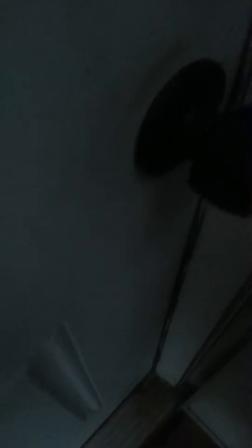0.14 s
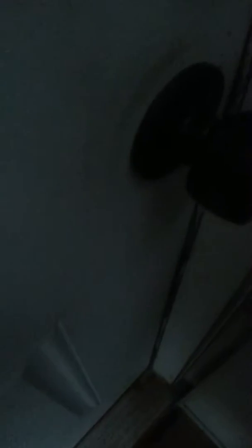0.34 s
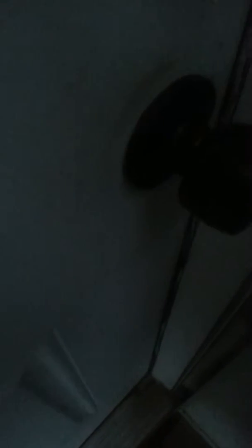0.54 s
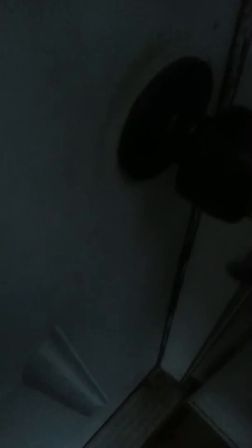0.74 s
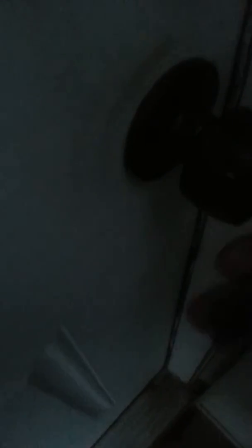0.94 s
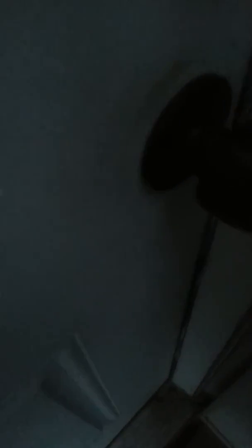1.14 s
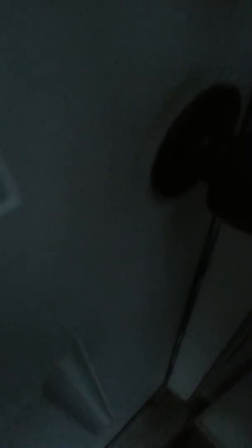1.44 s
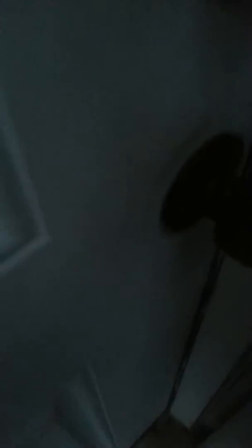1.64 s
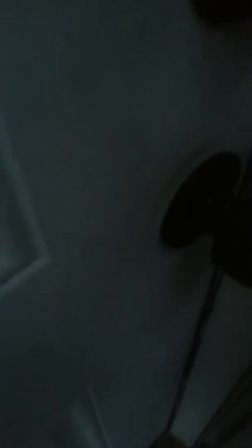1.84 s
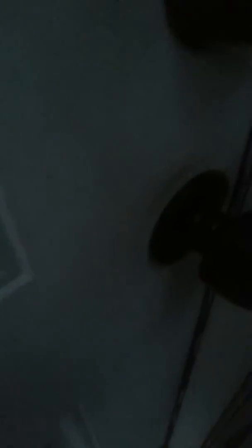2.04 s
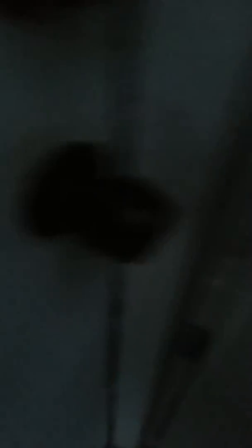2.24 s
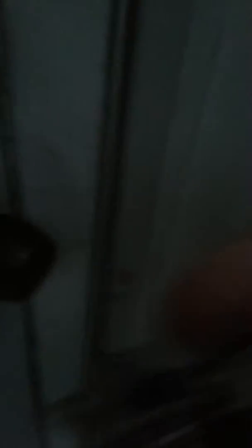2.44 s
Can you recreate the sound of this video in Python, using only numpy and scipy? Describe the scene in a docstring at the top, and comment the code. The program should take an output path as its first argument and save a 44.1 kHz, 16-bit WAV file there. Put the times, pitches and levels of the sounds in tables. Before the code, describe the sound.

Keys jangle and scrape in a door lock, with bolt knocks and dull thuds in the door

```python
"""Keys tick and scrape in a door lock close to the microphone, to the right, as the door is unlocked and swings open.
Contacts are cracks of coloured noise with short partials, slides are dense runs of tiny blips, glancing edges ping,
and a few keys of the dangling bunch ring on as decaying modes. The bolt knocks in the door: noise bursts rattle
the lock case and thud in the panel, with hollow wooden clonks. A hallway answers the keys and the lock case;
a low room rumble and a faint hiss lie underneath."""
import sys
import numpy as np
from scipy import signal
from scipy.fft import rfft, irfft
from scipy.io import wavfile

SR = 44100
rng = np.random.default_rng(int(sys.argv[2]) if len(sys.argv) > 2 else 0)


def dump(signal):
    """Clip the signal to [-1, 1] and save it as 16-bit WAV at the path in sys.argv[1]."""
    limited = np.clip(np.atleast_2d(signal).T, -1, 1)
    pcm = np.round(limited * 32767).astype(np.int16)
    wavfile.write(sys.argv[1], SR, pcm)


N = 114660
T = np.arange(N) / SR  # time [s]

# colour of metal contacts, main body: (frequency [Hz], relative level [dB])
METAL_BODY = [(1500, -12.5), (2800, -13), (3600, -10.5), (4150, -6.5), (4700, -8.5), (5600, -1.5),
              (6800, 0.5), (7500, -4.5), (8400, -10), (10000, -36.5)]
# colour of metal contacts, top octave: (frequency [Hz], relative level [dB])
METAL_TOP = [(7000, -18.5), (8600, -2.5), (9700, -1), (10600, -2), (11900, -2.5), (13200, -5),
             (14200, -5.5), (15200, -38)]

KEY_LIKENESS, DOOR_LIKENESS = 0.17, 0.93  # correlation of left and right
CONTACT_RISE_S = 0.00036
METAL_CHATTER_DB = 1
RING_HIGH_HZ = 14480  # highest partial of the keys


def from_db(db):
    """Decibels to gain."""
    return 10 ** (np.asarray(db) / 20)


def colour(x, points):
    """Minimum-phase filter with the given spectrum and unit power gain, falling steeply past its ends."""
    hz, db = np.transpose(points)
    size = 8192
    octave = np.log2(np.maximum(np.arange(size // 2 + 1) * SR / size, 1))
    ends = np.log2(hz)
    octaves_outside = np.abs(octave - np.clip(octave, ends[0], ends[-1]))
    gain = from_db(np.interp(octave, ends, db) - 20 * octaves_outside)
    gain = gain / np.sqrt(np.mean(gain ** 2)) + 1e-5
    # folding the cepstrum makes the filter causal
    cepstrum = irfft(np.log(gain))
    cepstrum[1:size // 2] *= 2
    cepstrum[size // 2 + 1:] = 0
    impulse = irfft(np.exp(rfft(cepstrum)))
    return signal.fftconvolve(x, impulse[None], axes=1)[:, :N]


def stereo_noise(likeness):
    """White noise in two channels whose correlation is the likeness."""
    mid, side = rng.standard_normal((2, N))
    return np.sqrt((1 + likeness) / 2) * mid + np.sqrt((1 - likeness) / 2) * side * [[1], [-1]]


def pan(x, right_db):
    """Tilts the level towards the right; a negative value tilts it left."""
    return x * from_db(np.array([[-.5], [.5]]) * right_db)


def decays(times, levels_db, lengths_s):
    """Envelope of sudden blows that die exponentially and add in power."""
    power = np.zeros(N)
    for s, db, time_constant in np.broadcast(times, levels_db, lengths_s):
        i = int(s * SR)
        age = T[:N - i][:SR // 3]
        power[i:i + len(age)] += from_db(db) ** 2 * np.exp(-2 * age / time_constant)
    return np.sqrt(power)


def soften(envelope, rise_s):
    """Rounds the attacks of an envelope with a one-pole smoother."""
    r = np.exp(-1 / (rise_s * SR))
    return signal.lfilter([1 - r], [1, -r], envelope)


def chatter(depth_db):
    """Loose metal touches and parts again: a fast uneven gain of unit power."""
    knots_per_s = 350
    knots = np.clip(rng.standard_normal(N // 10), -2, 2)
    gain = from_db(depth_db * np.interp(T * knots_per_s, np.arange(len(knots)), knots))
    return gain / np.sqrt(np.mean(gain ** 2))


def partials(times, levels_db, low_hz, high_hz, t60, count=7):
    """Each blow rings its own random set of partials, in different phases on each side."""
    out, age = np.zeros((2, N)), T[:SR // 5]
    fade = from_db(-60 * age / t60) * np.sqrt(2 / count)
    for s, db in zip(times, levels_db):
        i = int(s * SR)
        pitch, phase, *side_phases = rng.random((4, count, 1))
        hz = low_hz + (high_hz - low_hz) * pitch
        cycles = hz * age + phase + np.array(side_phases) * .5
        ring = np.sin(2 * np.pi * cycles).sum(1)
        out[:, i:i + len(age)] += (from_db(db) * fade * ring)[:, :N - i]
    return out


def blips(times, levels_db, pitches_hz, swell_s):
    """Tiny tones that swell and die within milliseconds, in a different phase on each side."""
    out, age = np.zeros((2, N)), T[:SR // 60]
    shape = age / swell_s * np.exp(1 - age / swell_s)
    phases = rng.random((len(times), 2, 1)) * .5
    for s, db, hz, phase in zip(times, levels_db, pitches_hz, phases):
        i = int(s * SR)
        tone = np.sin(2 * np.pi * (hz * age + phase))
        out[:, i:i + len(age)] += (from_db(db) * shape * tone)[:, :N - i]
    return out


def room(x, wet_db):
    """Adds the short diffuse tail of a hallway: decaying noise after a small gap."""
    t60, gap_s = 0.43, 0.0078
    age = T[:SR // 2]
    tail = rng.standard_normal((2, len(age))) * from_db(-60 * age / t60) * (age > gap_s)
    tail /= np.sqrt(np.sum(tail ** 2, axis=1, keepdims=True))
    return x + from_db(wet_db) * signal.fftconvolve(x, tail, axes=1)[:, :N]


def background():
    """Low rumble, nearly alike on both sides, under a faint diffuse hiss."""
    # colour of the room: (frequency [Hz], relative level [dB])
    room_colour = [(25, -23), (60, -9), (110, -2.5), (170, -5.5), (300, -14.5), (600, -18), (2200, -28.5),
                   (5500, -25), (8500, -31), (14500, -50.5)]
    level_db, split_hz, hiss_likeness, rumble_side_db = -38.5, 473, 0.023, 1.0
    low_pass = signal.butter(2, split_hz, fs=SR, output="sos")
    high_pass = signal.butter(2, split_hz, "high", fs=SR, output="sos")
    rumble = signal.sosfilt(low_pass, stereo_noise(DOOR_LIKENESS))
    hiss = signal.sosfilt(high_pass, stereo_noise(hiss_likeness))
    return from_db(level_db) * colour(pan(rumble, rumble_side_db) + hiss, room_colour)


def ticks():
    """Each contact is a hard crack, then milliseconds of unevenly buzzing metal and a few short partials."""
    # contacts of keys and lock: (time [s], level [dB], top octave re body [dB], buzz re contact [dB]),
    # the levels before the offsets below
    contacts = [(0.2113, -8.5, -11, -8.5), (0.316, -23.5, -30, -6), (0.329, -24, -13.5, -6.5),
                (0.377, -4.5, -5.5, -12.5), (0.393, -6, -14, -16), (0.4422, -22.5, -7, -2),
                (0.584, -17.5, -12, -3.5), (0.5982, -10.5, -12, -9.5), (0.619, -16, -2, -6),
                (0.7022, -10, -2.5, -6), (0.714, -8.5, -6.5, -5), (0.7322, -3.5, -8.5, -11),
                (0.754, -10.5, -5, -13.5), (0.7808, -14, -10, -21), (0.822, -19, -6, -14),
                (0.8698, -16, -10, -15), (0.934, -20.5, -1, 1.5), (0.9606, -12.5, 1.5, -16),
                (0.973, -16, -2, -13), (0.9982, -6, 1, -16), (1.029, -12.5, -5, -3.5), (1.037, -13, -6, 0),
                (1.048, -16, 1, -9), (1.0701, -19.5, -2.5, 6.5), (1.1031, -19, 3.5, -3.5),
                (1.1696, -11, -5, -4), (1.1771, -9.5, -24, -5.5), (1.217, -14, -18, -7.5),
                (1.32, -26.5, -11, 10), (1.336, -6, -6.5, -4), (1.3498, -6, -1, -23),
                (1.3728, -16, -7.5, -6), (1.4265, -13.5, -15, -9), (1.5863, -18.5, -9, 1),
                (1.6309, -15.5, -8.5, -0.5), (1.664, -11, -8, -9.5), (1.6854, -20.5, -2.5, -1.5),
                (1.7047, -13, 1.5, -0.5), (1.8237, -20, -9, 2), (1.8393, -4.5, -3, -3.5),
                (1.8445, -6, -5, -4.5), (1.8637, -6.5, -12, -4), (1.8973, -11.5, 0, -3),
                (1.9268, -17, 4, 0), (1.9658, -4.5, -12, -10.5), (1.9925, -25.5, 13, -2),
                (2.0152, -21.5, 7.5, -1), (2.0615, -7.5, 2.5, -7.5), (2.115, -6.5, -9, -18),
                (2.128, -18, -16, -2), (2.157, -4.5, -21, -4), (2.2353, -23, -6.5, 4.5),
                (2.2783, -10, 0.5, 2), (2.324, -9, -19, -6), (2.3448, -19, -12, -11),
                (2.551, -17.5, -9.5, -10)]
    crack_db, buzz_db, ring_db = -0.5, -5.5, -9
    crack_s, body_buzz_s, top_buzz_s = 0.00046, 0.0079, 0.0059  # decay time constants
    ring_t60, ring_low_hz, ring_split_hz = 0.044, 3111, 8600
    s, db, top, buzz = np.transpose(contacts)
    rebounds = chatter(METAL_CHATTER_DB)

    def strike(level_db, buzz_s, low_hz, high_hz):
        """One band of the contacts: crack and buzz as noise, with partials ringing inside the band."""
        crack = decays(s, level_db + crack_db, crack_s)
        buzzing = rebounds * decays(s, level_db + buzz + buzz_db, buzz_s)
        envelope = soften(np.hypot(crack, buzzing), CONTACT_RISE_S)
        ring = partials(s, level_db + buzz + ring_db, low_hz, high_hz, ring_t60)
        return envelope * stereo_noise(KEY_LIKENESS) + ring

    body = strike(db, body_buzz_s, ring_low_hz, ring_split_hz)
    high = strike(db + top, top_buzz_s, ring_split_hz, RING_HIGH_HZ)
    return colour(body, METAL_BODY) + colour(high, METAL_TOP)


def lock():
    """Each knock of bolt or knob rattles the lock case and sets the door panel thudding a little longer."""
    # knocks: (time [s], case level [dB], panel thud level before its offset [dB], case decay [s])
    knocks = [(0.2115, -29, -17.5, 0.02), (0.327, -29.5, -21.5, 0.017), (.378, -31, -20.5, 0.021),
              (.400, -39, -23, 0.023), (0.439, -32.5, -19, 0.018), (0.583, -27, -18, 0.022),
              (0.5958, -26.5, -21.5, 0.023), (0.623, -29.5, -23, 0.072), (.716, -26.5, -10.5, 0.016),
              (0.73, -20.5, -16.5, 0.02), (0.757, -21.5, -15, 0.012), (0.869, -28, -27.5, 0.046),
              (1.029, -28.5, -33, 0.22), (1.101, -38, -21, 0.054), (1.144, -24.5, -13, 0.024),
              (1.17, -22.5, -22, 0.019), (1.3225, -18, -16, 0.017), (1.337, -23, -36, 0.027),
              (1.372, -18.5, -19, 0.017), (1.389, -25.5, -22, 0.036), (1.563, -33, -17.5, 0.042),
              (1.623, -32.5, -14.5, 0.073), (1.685, -33, -13, 0.041), (1.727, -25, -41, 0.03),
              (1.745, -23.5, -32, 0.013), (2.157, -24.5, -31, 0.019), (2.236, -28, -24, 0.016),
              (2.324, -30.5, -29, 0.012)]
    # colour of the lock case: (frequency [Hz], relative level [dB])
    case_colour = [(150, -8.5), (300, -3.5), (480, -2.5), (620, -2), (800, -2), (1050, -6), (1300, -10.5),
                   (1800, -4), (2150, -8.5), (2600, -12.5), (4100, -5), (7000, -49)]
    # colour of the door panel: (frequency [Hz], relative level [dB])
    panel_colour = [(25, -30.5), (55, -13), (100, -1), (170, -0.5), (220, -4.5), (300, -11), (500, -19),
                    (1200, -55)]
    ring_db, ring_t60, ring_low_hz, ring_high_hz = -14, 0.15, 350, 2400
    thud_db, thud_rise_s, thud_stretch = -6.5, 0.0035, 1.11
    case_likeness, case_room_db, case_side_db, panel_side_db = 0.019, -13.5, -2.5, 1.5
    s, db, thud, decay_s = np.transpose(knocks)
    rattle = soften(decays(s, db, decay_s), 2 * CONTACT_RISE_S) * stereo_noise(case_likeness)
    ring = partials(s, db + ring_db, ring_low_hz, ring_high_hz, ring_t60)
    case = colour(rattle + ring, case_colour)
    swell = soften(decays(s, thud + thud_db, decay_s * thud_stretch), thud_rise_s)
    panel = colour(swell * stereo_noise(DOOR_LIKENESS), panel_colour)
    return pan(room(case, case_room_db), case_side_db) + pan(panel, panel_side_db)


def clonks():
    """A firm blow rings a cluster of the door's wooden modes around one pitch."""
    # hollow clonks: (time [s], level [dB], pitch [Hz])
    blows = [(0.2134, -20.5, 189.3), (0.5957, -17.5, 486.5), (.599, -25, 738), (1.388, -27, 842),
             (2.161, -25.5, 258)]
    t60, q = 0.15, 3.5  # the modes spread by pitch / q to either side
    out = np.zeros((2, N))
    for s, db, hz in blows:
        modes = partials([s], [db], hz * (1 - 1 / q), hz * (1 + 1 / q), t60)
        wood = colour(modes, [(hz / 2, 0), (hz * 2, 0)])
        # a narrow band of unit power gain is loud inside: bring it back down
        out += wood * np.sqrt(2 * hz / (SR / 2))
    return out


def slides():
    """Sliding metal catches in a dense run of tiny uneven blips, each at its own pitch, over a little hiss."""
    # strokes: (start [s], end [s], level before its offset [dB], top octave re body [dB])
    strokes = [(0.575, 0.647, -29, -10), (0.688, 0.771, -26.5, -4), (0.861, 0.917, -29, -8),
               (0.913, 1.014, -24, -4.5), (1.02, 1.084, -22, -5), (1.097, 1.181, -23, -8),
               (1.307, 1.391, -26, -10), (1.385, 1.447, -37.5, -4), (1.556, 1.754, -30, -8),
               (1.764, 1.855, -24, -8), (1.828, 2.175, -24, -0.5), (2.11, 2.353, -28.5, -9),
               (2.427, 2.541, -35, -7)]
    slide_db, edge_s = -7, 0.012
    grains_per_s, grain_s, spread_db, hiss_db = 4500, .002, 2.2, -4
    chance, pitch, size = rng.random((3, N))
    caught = chance < grains_per_s / SR
    grain_db = spread_db * np.minimum(-np.log(size[caught]), 4)  # a few catch much harder
    grains = blips(T[caught], grain_db, pitch[caught] * SR / 2, grain_s)
    hiss = from_db(hiss_db) * chatter(METAL_CHATTER_DB) * stereo_noise(KEY_LIKENESS)
    scrape = grains / np.sqrt(np.mean(grains ** 2)) + hiss
    body, high = np.zeros((2, N))
    for start, end, db, top in strokes:
        ramps = np.minimum(T - start, end - T) / edge_s + .5
        stroke = from_db(db + slide_db) * np.clip(ramps, 0, 1)
        body += stroke
        high += stroke * from_db(top)
    return colour(body * scrape, METAL_BODY) + colour(high * scrape, METAL_TOP)


def pings():
    """A key's edge glances off another: one short pitched blip with a faint crack of metal."""
    # glancing touches: (time [s], level [dB], pitch [Hz])
    touches = [(.6545, -12, 6330), (.6675, -13, 6590), (0.6795, -3, 6330), (0.727, -21, 6640),
               (0.7344, -21, 4030), (0.92, -16, 7160), (.926, -13, 6520), (.933, -14, 6750),
               (0.942, -9, 6890), (.967, -16.5, 7970), (1.0297, -8.5, 11980), (1.0539, -11.5, 7120),
               (1.107, -22, 10100), (1.337, -11.5, 4120), (1.349, -14.5, 7400), (1.4188, -24.5, 5200),
               (1.866, -14, 6800), (2.017, -18, 9950), (2.044, -13, 11864), (2.061, -9.5, 6600),
               (2.085, -7, 10000), (2.096, -10, 11600), (2.281, -7, 5560)]
    swell_s, crack_db = .0016, -8.5
    s, db, hz = np.transpose(touches)
    envelope = soften(decays(s, db + crack_db, 2 * swell_s), CONTACT_RISE_S)
    crack = envelope * stereo_noise(KEY_LIKENESS)
    return blips(s, db, hz, swell_s) + colour(crack, METAL_BODY)


def chimes():
    """A struck hanging key rings its modes, slightly detuned, broken by chatter, and jostles its neighbours."""
    # strikes: (time [s], level before its offset [dB], which key)
    strikes = [(.912, -17, 2), (.926, -18, 2), (1.766, -25, 0), (1.782, -24, 0), (1.899, -21, 1),
               (1.967, -20.5, 1), (2.019, -19.5, 1), (2.061, -21, 1), (2.087, -17.5, 1), (2.187, -21, 2)]
    # for each of three keys, its modes: (frequency before detuning [Hz], relative level [dB], t60 [s])
    key_modes = [
        [(4420, -2.5, 0.27), (6900, 6.5, 0.1), (11348, 3, 0.38), (11900, -5, 0.22), (12800, -3, 0.18)],
        [(4800, -9, 0.26), (7100, -3, 0.36), (8140, -12, 0.46), (9500, -6, 0.18), (10060, 2, 0.095),
         (11600, 2.5, 0.1), (12441, -6, 0.11)],
        [(6720, 3, 0.15), (7090, -8, .12), (7880, -14, 0.37)],
    ]
    chime_db, spread_db, chatter_db, detune = -0.5, 1.5, 5.5, .0022  # detune as a fraction of pitch
    neighbours_db, neighbours_low_hz, neighbours_t60 = -8, 4130, .13
    out, age = np.zeros((2, N)), T[:SR // 3]
    for s, db, key in strikes:
        i = int(s * SR)
        for hz, mode_db, t60 in key_modes[key]:
            gain = from_db(chime_db + db + mode_db + spread_db * rng.standard_normal((2, 1)))
            pitch = hz * (1 + detune * rng.standard_normal())
            tone = np.sin(2 * np.pi * (pitch * age + rng.random((2, 1))))
            out[:, i:i + len(age)] += (gain * tone * from_db(-60 * age / t60))[:, :N - i]
    s, db, _ = np.transpose(strikes)
    neighbours = partials(s, db + neighbours_db, neighbours_low_hz, RING_HIGH_HZ, neighbours_t60, count=20)
    return out * chatter(chatter_db) + neighbours


def keys():
    """The bunch hangs to the right: its sound reaches the left side later, and weaker in the treble."""
    # treble, right over left: (time [s], level [dB])
    treble_side = [(.2, 10.5), (.7, 10.5), (1.05, 7), (1.3, 9), (1.68, 9.5), (1.85, 0.5), (2.3, 3.5)]
    left_lag_s, shadow_above_hz, room_db = 0.00044, 3300, -20
    left, right = room(ticks() + slides() + pings() + chimes(), room_db)
    both = np.array([np.roll(left, int(left_lag_s * SR)), right])
    low = signal.sosfilt(signal.butter(3, shadow_above_hz, "low", fs=SR, output="sos"), both)
    high = signal.sosfilt(signal.butter(3, shadow_above_hz, "high", fs=SR, output="sos"), both)
    return low + pan(high, np.interp(T, *np.transpose(treble_side)))


def scene():
    """Room, keys, lock and door together."""
    return background() + keys() + lock() + clonks()


def record(dry):
    """The sharpest peaks are rounded and the top is cut steeply."""
    cutoff_hz = 14900
    rounded = .9 * np.tanh(dry / .9)
    low_pass = signal.ellip(8, .3, 75, cutoff_hz, fs=SR, output="sos")
    return signal.sosfilt(low_pass, rounded)


dry = scene()
out = record(dry)
dump(out)
```